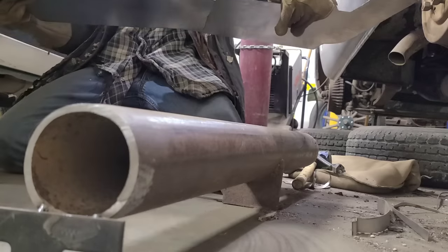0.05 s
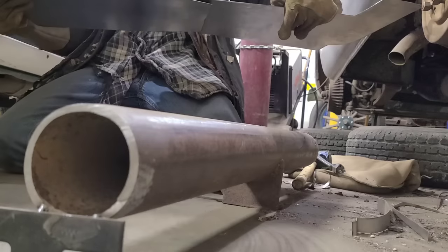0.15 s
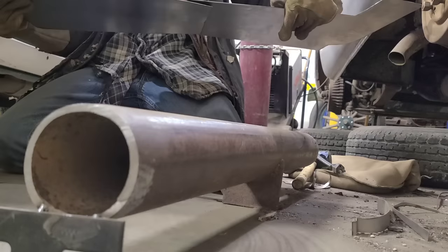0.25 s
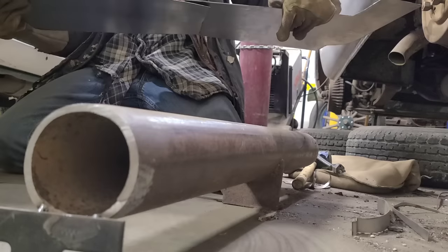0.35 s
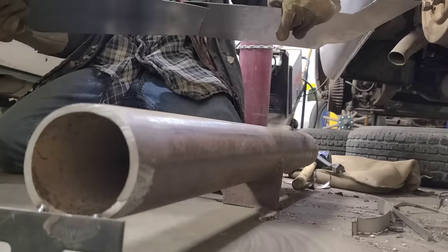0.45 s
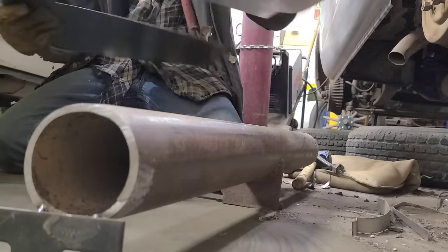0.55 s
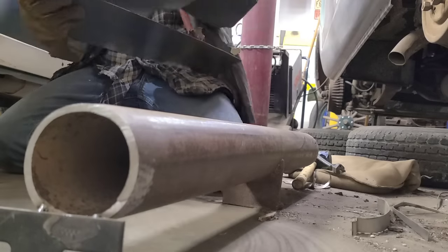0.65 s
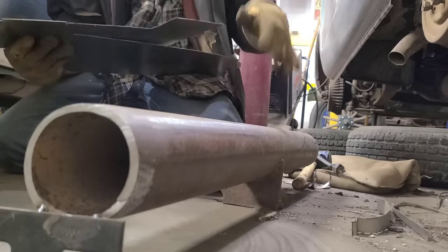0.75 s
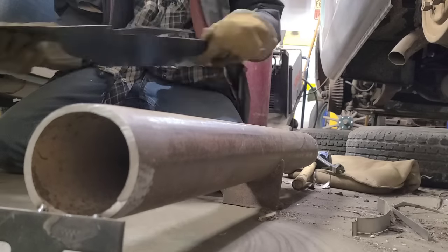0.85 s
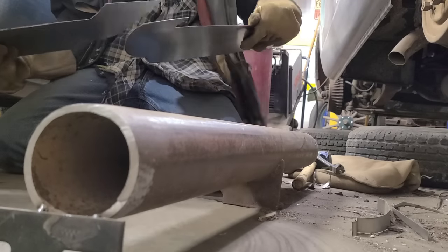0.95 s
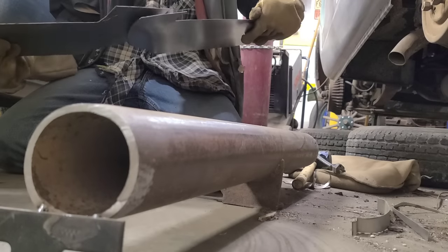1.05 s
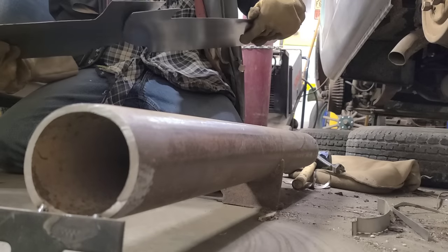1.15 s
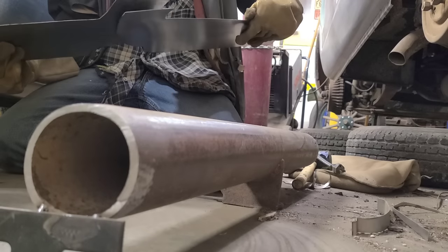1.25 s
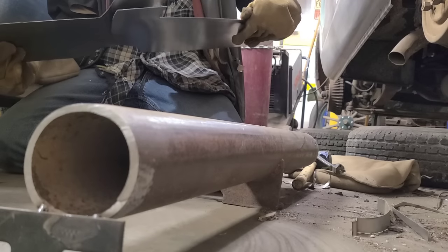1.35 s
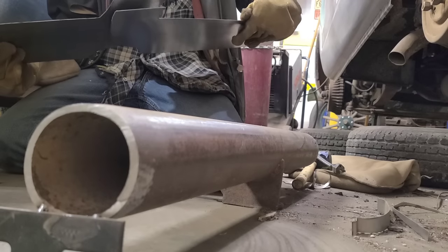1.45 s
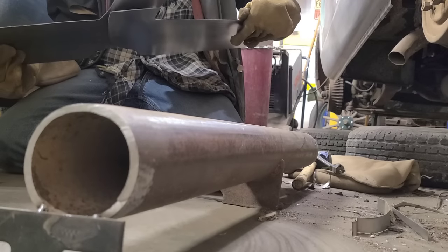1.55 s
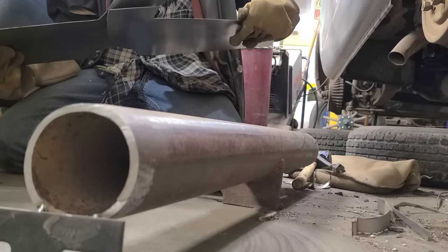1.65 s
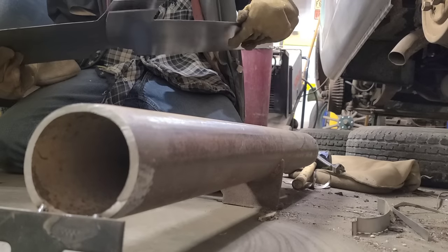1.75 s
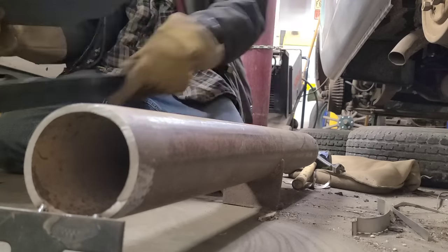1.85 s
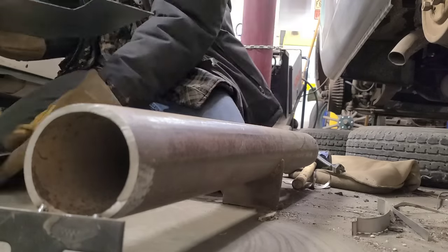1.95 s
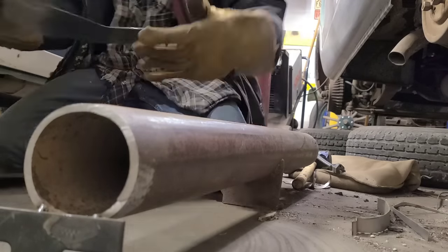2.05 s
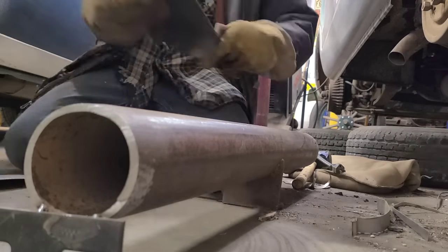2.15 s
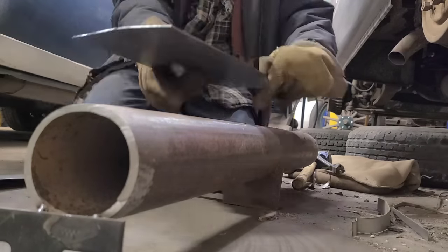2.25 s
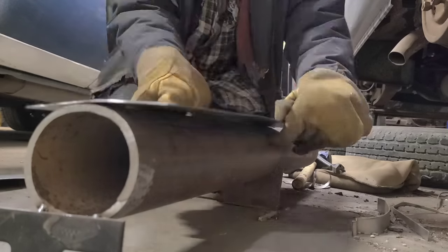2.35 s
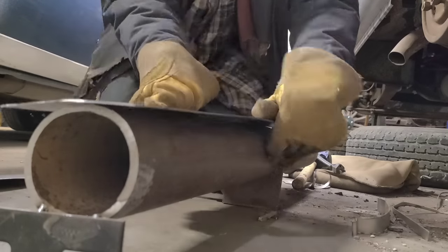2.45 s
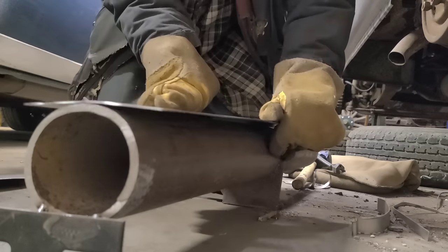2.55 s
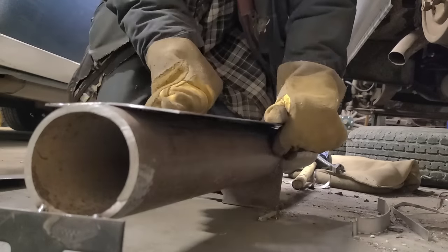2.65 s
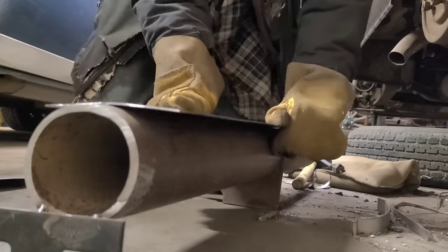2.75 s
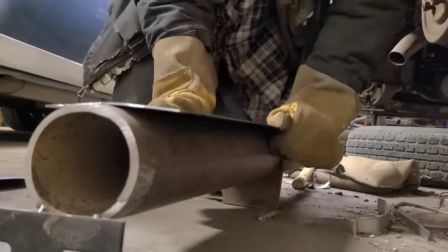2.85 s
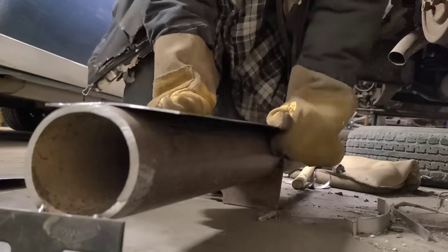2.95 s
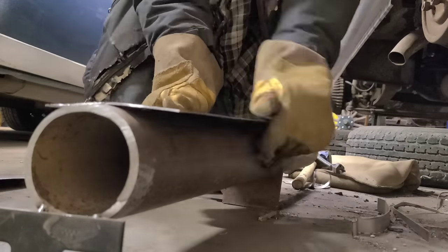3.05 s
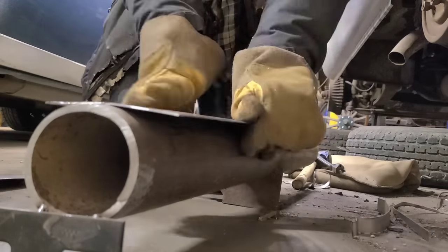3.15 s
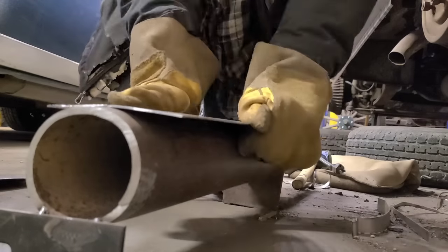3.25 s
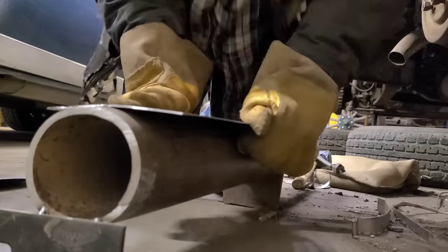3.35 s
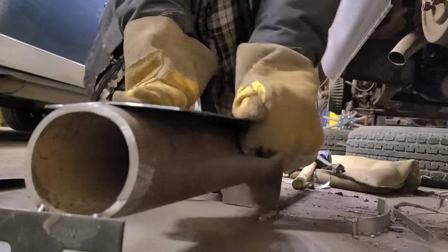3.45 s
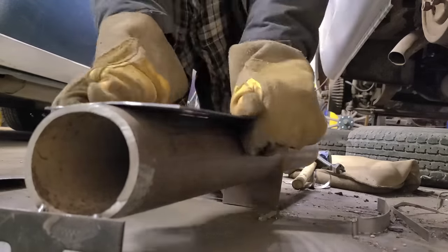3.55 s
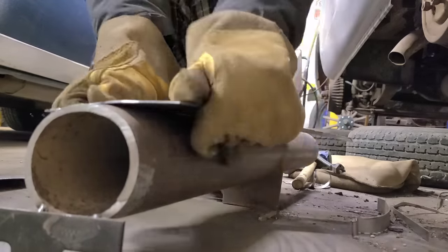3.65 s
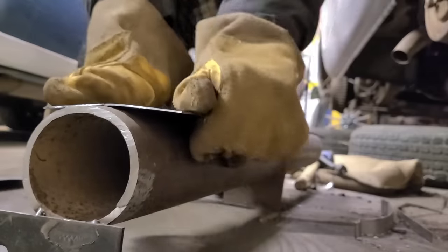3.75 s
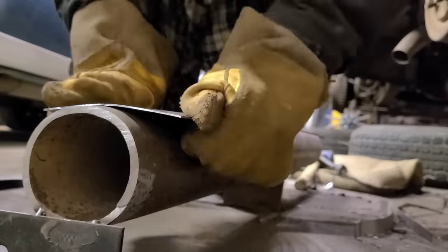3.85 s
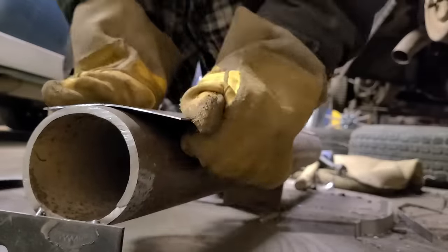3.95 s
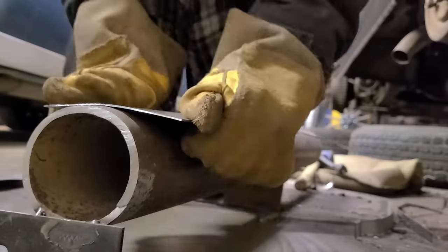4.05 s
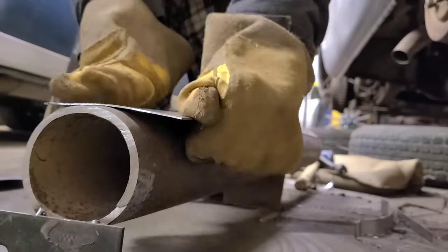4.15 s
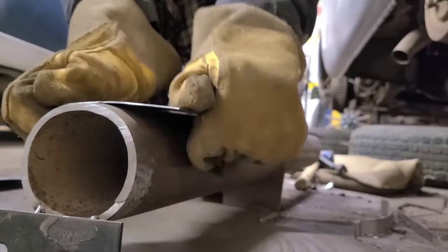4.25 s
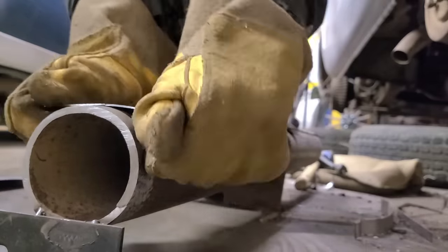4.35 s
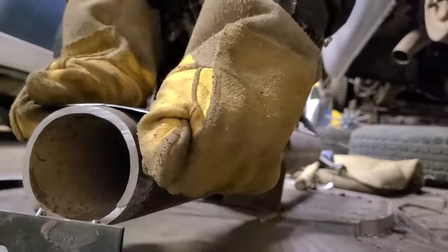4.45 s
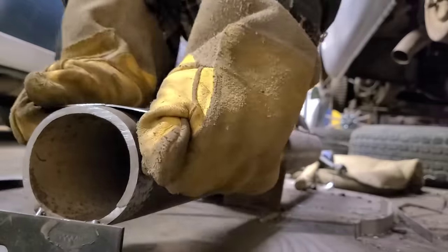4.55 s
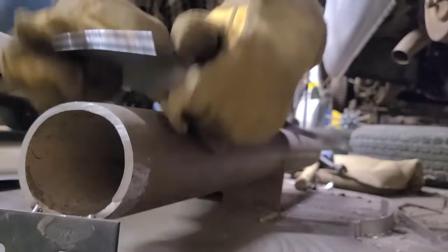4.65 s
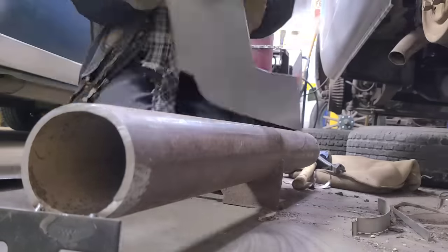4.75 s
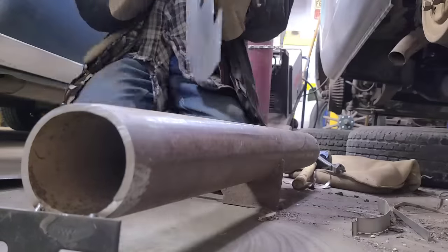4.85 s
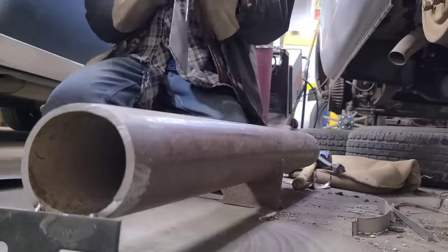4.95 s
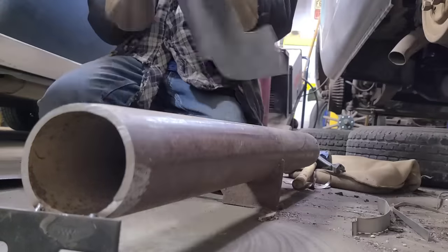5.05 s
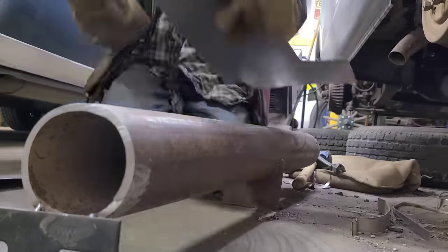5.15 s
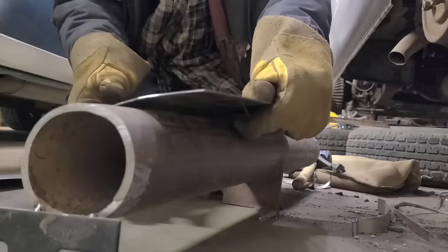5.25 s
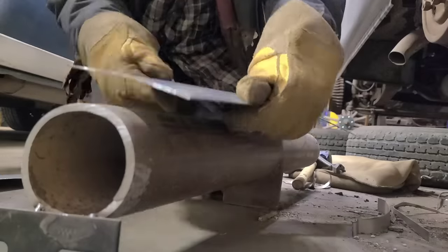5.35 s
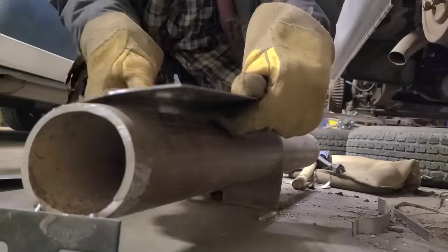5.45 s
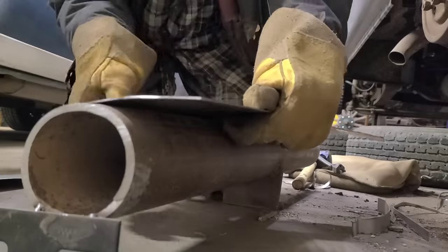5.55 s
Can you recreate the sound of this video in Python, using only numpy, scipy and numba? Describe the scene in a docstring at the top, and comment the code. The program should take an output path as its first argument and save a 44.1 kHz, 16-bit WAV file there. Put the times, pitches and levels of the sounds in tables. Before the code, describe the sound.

A close stereo microphone near the floor hears a cluttered workshop with low rumble, faint wavering hum and a short dull tail. Quiet glove and sheet rustle opens, then at about 0.7 s a sharp, bright steel clang cracks out, followed by a gritty scrape from 0.8 to 0.95 and a lower knock at 1.0. Soft rubbing and near quiet last until 1.9, when the sheet drags over scrap with a loud ringing, hissing clatter until about 2.15. At 2.33 it knocks onto a thick pipe with a small clean ring. From 2.7 to 4.6 pressing brings faint creaks, soft gritty swells and tiny ticks, with firmer knocks from 3.77, a dull heavy clunk near 4.04 and small knocks to 4.6. A light scrape comes at 4.65, a hollow pipe knock at 5.26 and a closing pair of metallic clunks near 5.5.

```python
"""A steel sheet is shifted in gloved hands, dragged over scrap, laid on a thick pipe and pressed round it.
Each contact is a burst of gritty noise that rings modes of the sheet and, once laid, of the pipe;
noise cracks and clean decaying tones add ticks and taps. Flickering fine noise holds rustle and the noisy
tails of loud contacts. The place is a cluttered workshop: short dull tail, low rumble, wavering tone near
91 Hz and room tone. The microphone is a pair of spaced ports near the floor."""
import sys
import numpy as np
from scipy import signal
from scipy.fft import rfft, irfft, next_fast_len
from scipy.io import wavfile
from scipy.ndimage import uniform_filter1d
from numba import njit

SR = 44100
rng = np.random.default_rng(int(sys.argv[2]) if len(sys.argv) > 2 else 0)


def store_wav(level_fs):
    """Save 16-bit WAV to argv[1]."""
    pcm = np.round(np.clip(np.atleast_2d(level_fs), -1, 1) * 32767)
    wavfile.write(sys.argv[1], SR, pcm.T.astype(np.int16))


N = 246519

# knocks and slips of the sheet; weight and brightness against the clang, all before the knock trim:
# (time [s], clang [dB], weight [dB], brightness [dB], hold [s], left minus right [dB], note [Hz])
KNOCKS = [(0.106, -42.5, -32, 1, 0.038, 0, 890), (0.162, -47, -0.5, -18, 0.015, -2, 1430),
          (0.364, -72, 14, 11.5, 0.017, 0, 340), (0.486, -42, -34, 4, 0.012, 2.5, 2583),
          (0.561, -42, 0.5, -1, 0.012, 0.5, 3030), (0.602, -41, -17, -16, 0.025, 2, 357),
          (0.679, -15, -6.5, 0, 0.0029, 1, 397), (0.699, -19.5, -8.5, -34, 0.0075, -3, 370),
          (0.997, -25.5, -8.5, -22, 0.011, -1.5, 1360), (1.025, -28.5, -4.5, -31, 0.0094, -1, 1960),
          (1.511, -58, -12, -5, 0.022, 2.5, 436), (2.326, -28.5, -10.5, 1, 0.031, 2.5, 1130),
          (2.354, -30, -9.5, -3, 0.029, 1, 1120), (2.422, -53, -14, 2, 0.035, 2.5, 1050),
          (2.554, -49, -20, 7.5, 0.023, 4, 1930), (2.576, -44, -18, 9, 0.024, 3, 1120),
          (2.685, -55.5, -3, -27, 0.032, 1, 1090), (3.778, -48, 3, -40, 0.0081, 2, 540),
          (3.866, -44, -5, -1, 0.018, 2, 1880), (3.896, -41, 8, 18.5, 0.0073, 1, 1374),
          (3.981, -35.5, -8, 7, 0.012, 2, 1270), (4.039, -24.5, -14, -30, 0.003, -2, 790),
          (4.061, -44, -2, -6, .008, 3, 720), (4.114, -52.5, -17, -34, 0.0077, -18, 2780),
          (4.2, -42, -6, -11.5, 0.021, 2, 2740), (4.372, -44, 9, -44, 0.012, 1.5, 570),
          (4.397, -45, 5, 0, 0.028, -1, 1020), (4.434, -49, -3, 13, 0.038, 1, 1610),
          (4.54, -41, -2, -18, 0.015, -3, 1154), (4.565, -59.5, -1, 30.5, 0.038, 5.5, 456),
          (4.607, -34.5, -19, -5, 0.014, -0.5, 970), (5.096, -49.5, -8, -34, 0.034, 0, 1145),
          (5.256, -34, -10.5, -26, 0.024, 1, 423), (5.481, -31, -6, -46, .021, -2, 440),
          (5.516, -29.5, -15, -18.5, 0.0072, -0.5, 1300), (5.535, -40.5, -9, -5.5, 0.028, 1, 1250)]
# scrapes and soft swelling presses, one table each, before their trim:
# (time [s], clang [dB], weight [dB], brightness [dB])
SCRAPES_AND_PRESSES = [
    [(0.805, -65.5, -1, -20), (0.813, -54.5, 0.5, -5.5), (0.829, -40, -14, -32.5), (0.845, -34, -5, 6.5),
     (0.881, -27.5, -18.5, 9.5), (0.907, -44.5, -20.5, -2.5), (0.925, -29.5, -7.5, -9),
     (0.933, -41, -11, -11), (0.97, -68, -11, -34)],
    [(1.17, -77, -16.5, 4.5), (1.186, -60, -21, -4), (1.22, -55, -13, -5), (1.26, -58, -3, -1),
     (1.282, -47.5, -11, -4), (1.304, -50, -14, -11), (1.332, -73, -11, -3), (1.34, -93, 13, -7)],
    [(1.8, -72, -4, -11), (1.828, -60, 6.5, -20.5), (1.864, -57, 0, -10), (1.906, -48.5, 1, -19),
     (1.912, -57, 2, 3)],
    [(1.914, -51, -6, -15), (1.92, -21.5, -28, -11.5), (1.95, -19, -19.5, -8.5), (1.99, -29.5, -10, -2),
     (2.018, -14.5, -17, -9), (2.046, -15.5, -21, -0.5), (2.078, -21.5, -14.5, -2), (2.116, -23, -17.5, 1),
     (2.188, -44.5, -56, -33), (2.2, -46, -26, -27)],
    [(3.0, -67, -9, -10), (3.018, -59.5, -2, -12), (3.088, -50.5, -7, -2), (3.132, -72, -13, -18),
     (3.156, -55, -12, -9), (3.2, -65, 4, -1)],
    [(3.235, -66, -1, -4), (3.271, -53, -0.5, -1), (3.369, -60, -8.5, -2), (3.385, -46.5, -6.5, -7),
     (3.423, -64, -4, 3), (3.437, -61.5, -1, -5), (3.475, -53, 1, -1), (3.511, -67.5, 17, -5),
     (3.523, -54, 3, -20), (3.545, -76, -12, -8)],
    [(3.575, -72, -9, 6), (3.617, -56.5, -8, 0), (3.623, -48.5, -12, -13), (3.635, -56, -9, -1),
     (3.647, -58.5, 6, -1), (3.675, -83, -6, -5)],
    [(3.75, -65, 8, 3), (3.768, -53.5, 4.5, -7), (3.778, -38, -15, -12), (3.796, -56, 5, -5),
     (3.802, -74, -7, -18), (3.812, -57.5, 4.5, -4), (3.86, -60, -8, 2)],
    [(3.925, -51, -14, -2), (3.941, -62.5, -19, 18), (3.959, -49, 8, 1), (3.975, -55, 2, -8),
     (3.978, -45, -4, 4)],
    [(4.645, -54, 0, -4), (4.655, -39.5, -18, 1), (4.713, -29.5, -20.5, -29), (4.733, -46, -9, -1.5),
     (4.779, -51, 0, -9), (4.82, -64, -6, 2.5)],
]
# how the sheet is held in each scrape or press:
# (sheet ring [dB], extra hiss [dB], left minus right [dB], note [Hz], note level [dB])
GRIPS = [(-9.5, -4, 0.5, 2500, -19.5), (-3, 0.5, 1, 1370, -29), (-18, 3.5, 0, 1120, -16),
         (9, -3.5, 2, 1856, -20.5), (-8, -1, 0, 1173, -13.5), (-10, 1, 1, 2760, -24.5),
         (-3, 3, 2.5, 1260, -9), (-5, -4, -0.5, 4300, -4), (-10, -3.5, -1, 900, -12),
         (15.5, 1, 1, 2200, -24)]
# how freely the steel rings after a knock, as the gloves tighten and let go: (time [s], level [dB])
FREEDOM = [(0, -17), (.6, 4), (.7, -15), (1.02, -4), (2.33, 3), (2.6, 3), (3.77, 6.5), (4.0, -3.5),
           (4.2, -2), (4.4, -9), (4.61, -2), (5.25, -5.5), (5.59, 4.5)]
# modes of the sheet, loose and then bent under the palms: (frequency [Hz], level [dB], t60 [s])
LOOSE_SHEET_MODES = [(305, -4, .08), (375, 0, .09), (707, -2, .1), (807, -4, .09), (1138, -2, .1),
                     (1323, 0, .13), (1416, -2, .11), (1500, 1, .2), (1545, 1, .2), (1590, -4, .16),
                     (1674, 0, .18), (1712, -4, .35), (1768, -3, .2), (1803, 0, .2), (1855, -2, .42),
                     (1954, -1, .33), (1980, 0, .2), (2015, 2, .38), (2100, -4, .15), (2570, -8, .12),
                     (3279, -8, .1), (3776, -7, .08)]
BENT_SHEET_MODES = [(150, -2, .12), (253, -4, .2), (525, 0, .1), (1007, -3, .1), (1093, -5, .2),
                    (1285, -5, .1), (2008, 8, .25), (2175, 6, .17), (2600, -3, .08), (3068, -6, .1)]
# modes of the pipe's wall and of the air inside it: (frequency [Hz], level [dB], t60 [s])
PIPE_WALL_MODES = [(1120, 4, .35), (2046, -4, .2), (3098, -5, .15)]
PIPE_AIR_MODES = [(409, 0, .33)]
# contact colours from low to high: (centre [Hz], width [Hz], level [dB])
BOOM = [(130, 160, 0)]
THUD = [(369.6, 487, 0)]
CLANG = [(735, 130, -10.5), (1500, 2620, -1.5)]
HISS = [(3360, 1900, 0.042), (6000, 3870, 0.079)]
SIZZLE = [(8440, 5000, 0), (12500, 8200, 1)]
# power share common to both ports, one for each colour from boom to sizzle: (share [0-1])
COMMON_SHARES = [1, 0.78, 0.45, 0.2, 0.42]
# sharp ticks and thumps of edge on steel, before the tick trim:
# (time [s], level [dB], centre [Hz], t60 [s])
TICKS = [(0.6871, -2, 4180, 0.011), (0.69, -30, 95, 0.1), (2.031, -32, 95, 0.17), (1.919, -25, 3920, 0.027),
         (2.039, -3, 2004, 0.016), (2.325, -41, 2600, 0.075), (2.688, -40, 3000, 0.017),
         (2.84, -35.5, 8000, 0.012), (2.897, -36, 6000, 0.015), (2.964, -40.5, 6360, 0.056),
         (3.47, -37, 150, 0.26), (3.803, -32, 1500, .01), (3.891, -25, 6000, 0.034),
         (3.903, -24, 8500, 0.011), (4.032, -22, 2860, 0.13), (4.372, -50, 680, 0.027),
         (5.485, -25, 1404, 0.056)]
# clean taps on the pipe: (time [s], wall level [dB], air column level [dB])
TAPS = [(2.331, -47, -55), (2.37, -73, -71), (2.6, -72, -81), (3.468, -56, -82), (3.773, -79, -49.5),
        (4.679, -40.5, -70), (5.261, -51.5, -33), (5.486, -59, -44)]
# the left port hears contacts first: (time [s], lead [ms])
LEFT_LEAD = [(0, 0.29), (.8, .3), (1.3, 0.2), (2.0, 0.49), (2.3, 0.084), (5.59, 0.19)]
# flickering fine noise, rustle with the noisy tails of the loud contacts:
# (time [s], middle level [dB], treble level [dB])
FINE_NOISE = [(0.0, -68, -64.5), (0.48, -71.5, -81.5), (0.73, -52.5, -67), (0.87, -72, -70),
              (1.31, -75.5, -76.5), (1.85, -70.5, -86), (2.04, -52, -56), (2.18, -62, -62.5),
              (2.54, -63.5, -63), (3.8, -63.5, -64), (3.89, -60, -60.5), (4.31, -61, -61.5),
              (4.66, -56.5, -59), (4.89, -63.5, -64.5), (5.51, -62, -67), (5.59, -65, -61)]
# low rumble, and level near 91 Hz, the hum plus the boom of heavy contacts:
# (time [s], rumble level [dB], level near 91 Hz [dB])
LOW_END = [(0.0, -62, -90), (0.08, -58, -92), (0.15, -66.5, -93), (0.73, -59, -64), (0.78, -68, -66),
           (1.07, -63.5, -77), (1.99, -59.5, -66), (2.48, -68.5, -71), (2.79, -55, -73), (3.02, -64, -73),
           (4.0, -65.5, -57), (4.06, -54, -61), (4.2, -63.5, -63), (4.66, -58.5, -61), (5.59, -68, -62.5)]
# spectrum of the room tone: (frequency [Hz], relative level [dB])
ROOM_TONE = [(59, -24), (100, 4), (129, -5), (194, -7), (270, -9), (900, -37.5), (1170, -83.5),
             (1980, -120)]

LAID_S = 2.3  # after this the sheet lies on the pipe
# knock settings, each for (sheet loose, sheet laid)
RISE_S, FALL_T60_S, SHEET_RING_DB = (0.017, 0.0013), (0.04, 0.047), (-4, -25)
BOOM_OVER_THUD_DB = (-26.5, -5.5)  # (sheet loose, sheet laid)
HISS_DB, HISS_SLOPE = 1.5, 0.63  # hiss against clang [dB], and its share of the brightness
KNOCK_PIPE_DB, SCRAPE_PRESS_PIPE_DB = 11.5, -4  # drive of the pipe
KNOCK_TRIM_DB, SCRAPE_PRESS_TRIM_DB, TICK_TRIM_DB = -10.0, -2.0, -13.5
STEEL_DB = -28.5  # all ringing modes against the direct contact
NOTE_DB, NOTE_T60_S = -13.5, .028  # note of the free span; FREEDOM is added to its level in knocks
CREAK_FROM_S, CREAK_TO_S, CREAK_COUNT = 2.7, 4.6, 22
CREAK_DB, CREAK_SPREAD_DB, CREAK_BRIGHT_DB, CREAK_HOLD_S = -68.5, 24, -5.5, 0.0049
PLATE_T60_S, PLATE_SHARE = .035, .6  # decay, and power share of the dense tail
SHIFT_S = .03  # a scrape or press meets a new spot of the sheet this often
LOW_TONE_HZ, ROOM_TONE_DB = 91.1, -65.5
ROOM_T60_S, ROOM_WET_DB, ROOM_DAMP_HZ = .22, -17.0, 5100.0
TOP_HZ = 15800


def contacts():
    """Knocks, creaks, scrapes and presses are heard directly and through the steel they set ringing."""
    colours = contact_colours()
    direct, loose, bent, pipe = buses = np.zeros((4, 2, N + SR))
    for event in KNOCKS + creaks():
        knock(buses, colours, *event)
    for table, grip in zip(SCRAPES_AND_PRESSES, GRIPS):
        scrape_or_press(buses, colours, table, *grip)
    steel = modes(loose[:, :N], LOOSE_SHEET_MODES)
    steel += modes(bent[:, :N], BENT_SHEET_MODES)
    steel += modes(pipe[:, :N], PIPE_WALL_MODES)
    return direct[:, :N] + undb(STEEL_DB) * steel


def knock(buses, colours, s, db, weight_db, bright_db, hold, pan_db, note_hz):
    """Contact pressure swells, holds, then dies away, and the sheet's free span answers with a note."""
    laid = int(s > LAID_S)
    rise = RISE_S[laid]
    t = np.arange(min(int(.3 * SR), N - int(s * SR))) / SR
    swell = np.sin(np.pi / 2 * np.minimum(t / rise, 1)) ** 2
    fall_db = -60 * np.maximum(t - rise - hold, 0) / FALL_T60_S[laid]
    burst = swell * rub(colours, s, db + KNOCK_TRIM_DB + fall_db, weight_db, bright_db)
    burst = signal.fftconvolve(burst, plate()[None], axes=1)[:, :len(t)]
    # the free span between gloves and contact has a damped note, given for each knock
    free_db = np.interp(s, *np.transpose(FREEDOM))
    heard = burst + undb(NOTE_DB + free_db) * resonate(burst, note_hz, NOTE_T60_S)
    place(buses, s, burst, heard, SHEET_RING_DB[laid] + free_db, pan_db, KNOCK_PIPE_DB + free_db)


def scrape_or_press(buses, colours, table, sheet_db, hiss_db, pan_db, note_hz, note_db):
    """The contact follows drawn levels while it rings one spot of the sheet after another."""
    s, *columns = np.transpose(table)
    t = np.arange(s[0], s[-1], 1 / SR)
    db, weight_db, bright_db = (np.interp(t, s, c) for c in columns)
    burst = rub(colours, s[0], db + SCRAPE_PRESS_TRIM_DB, weight_db, bright_db, hiss_db)
    burst = ring_spots(burst * signal.windows.tukey(len(t), .02))
    heard = burst + undb(note_db) * resonate(burst, note_hz, NOTE_T60_S)
    place(buses, s[0], burst, heard, sheet_db, pan_db, SCRAPE_PRESS_PIPE_DB)


def creaks():
    """Small bright knocks come at random moments while the palms press."""
    when, size, side, pitch = rng.random((CREAK_COUNT, 4)).T
    times = CREAK_FROM_S + (CREAK_TO_S - CREAK_FROM_S) * when
    levels = CREAK_DB + CREAK_SPREAD_DB * (2 * size - 1)
    pans_db, notes_hz = 6 * side - 1, 1000 * 3 ** pitch
    return [(s, db, -10, CREAK_BRIGHT_DB, CREAK_HOLD_S, pan_db, hz)
            for s, db, pan_db, hz in zip(times, levels, pans_db, notes_hz)]


def contact_colours():
    """The same gritty slips are filtered into five bands, partly common to the two ports."""
    slips = [grit() for _ in range(3)]
    bands = (BOOM, THUD, CLANG, HISS, SIZZLE)
    return [pair(*(shaped(v, humps(band)) for v in slips), share)
            for band, share in zip(bands, COMMON_SHARES)]


def rub(colours, s, db, weight_db, bright_db, hiss_db=0):
    """Slips from s on at the levels db; heavy contact adds bass, a bare edge adds treble."""
    now = slice(int(s * SR), int(s * SR) + len(db))
    boom, thud, clang, hiss, sizzle = (c[:, now] for c in colours)
    bass = thud + undb(BOOM_OVER_THUD_DB[int(s > LAID_S)]) * boom
    treble = undb(HISS_DB + hiss_db + HISS_SLOPE * bright_db) * hiss + undb(bright_db) * sizzle
    return undb(db) * (clang + undb(weight_db) * bass + treble)


def place(buses, s, burst, heard, sheet_db, pan_db, pipe_db):
    """The contact is heard and drives the sheet, and the pipe once they touch."""
    direct, loose, bent, pipe = buses
    add(direct, s, heard, pan_db)
    add(bent if s > LAID_S else loose, s, undb(sheet_db) * burst, pan_db)
    if s > LAID_S:
        add(pipe, s, undb(pipe_db) * burst, pan_db)


def plate():
    """A decaying noise tail stands for the thin sheet's countless damped modes, new at every call."""
    t = np.arange(1500) / SR
    tail = rng.standard_normal(len(t)) * undb(-60 * t / PLATE_T60_S)
    tail = tail / np.sqrt(np.sum(tail ** 2))
    return np.sqrt(PLATE_SHARE) * tail + np.sqrt(1 - PLATE_SHARE) * (t == 0)


def ring_spots(burst):
    """Each short stretch of a scrape or press rings another spot of the sheet."""
    step = int(SHIFT_S * SR)
    out = np.zeros((2, burst.shape[1] + step + 1500))
    for at in range(0, burst.shape[1], step):
        piece = signal.fftconvolve(burst[:, at:at + step], plate()[None], axes=1)
        out[:, at:at + piece.shape[1]] += piece
    return out


def ticks(cycles=1.1):
    """Sudden cracks: decaying noise without a swell, broad around its centre."""
    out, t = np.zeros((2, N + SR)), np.arange(2000) / SR
    noises = rng.standard_normal((len(TICKS), 3, len(t)))
    for (s, db, hz, t60), noise in zip(TICKS, noises):
        crack = resonate(pair(*noise, 0.093), hz, cycles / hz)
        add(out, s, unit(crack) * undb(db + TICK_TRIM_DB - 60 * t / t60))
    return out[:, :N]


def taps(swell_s=0.0015):
    """One clean blow starts the wall's modes and the air in the pipe together."""
    out, t = np.zeros((2, N + SR)), np.arange(SR // 2) / SR
    wall, air = (sum(undb(db - 60 * t / t60) * np.sin(2 * np.pi * hz * t) for hz, db, t60 in body)
                 for body in (PIPE_WALL_MODES, PIPE_AIR_MODES))
    swell = np.minimum(t / swell_s, 1)
    for s, wall_db, air_db in TAPS:
        sound = swell * (undb(wall_db) * wall + undb(air_db) * air)
        add(out, s, np.array([sound, sound]))
    return out[:, :N]


def fine_noise():
    """Fine grit that flickers, wide between the ports: rustle and the noisy tails of loud contacts."""
    middle_db, treble_db = curves(FINE_NOISE)
    middle = [(370, 930, 10.8), (1300, 1800, 7.5)]  # (centre [Hz], width [Hz], level [dB])
    treble = [(3180, 18000, 10.5), (5700, 2200, -1.1), (13820, 3700, -10)]
    out = 0
    for db, colour in ((middle_db, middle), (treble_db, treble)):
        grains = [shaped(grit(scatter_db=2.0, slip_s=0.0014), humps(colour)) for _ in range(3)]
        out = out + pair(*grains, 0.31) * undb(db + 0.49 * walk(25))
    return out


def low_end_and_room_tone():
    """Filtered noise makes rumble and room tone; a wavering sine and octave make hum and contact boom."""
    rumble_db, low_tone_db = curves(LOW_END)
    rumble_colour = humps([(38.4, 12.0, 4.9), (64.3, 28, 3.5)])
    rumble = shaped(rng.standard_normal(N), rumble_colour) * undb(rumble_db)
    phase = 2 * np.pi * np.cumsum(LOW_TONE_HZ * (1 + 0.0083 * walk(2))) / SR
    waver_db = 1.8 * walk(12)
    low_tone = np.sin(phase) + undb(-5.0) * np.sin(2 * phase)
    low_tone = np.sqrt(2) * undb(low_tone_db + waver_db) * low_tone
    hz, db = np.transpose(ROOM_TONE)
    tone = [shaped(rng.standard_normal(N), lambda f: undb(np.interp(np.log(f), np.log(hz), db)))
            for _ in range(3)]
    bass = (rumble + low_tone) * undb([[1.1], [-1.1]])  # a little stronger at the left port
    return bass + pair(*tone, 0.89) * undb(ROOM_TONE_DB)


def room(x):
    """A short, dull noise tail from the cluttered shop, other for each port."""
    t = np.arange(int(.6 * SR)) / SR
    tails = rng.standard_normal((2, len(t))) * undb(-60 * t / ROOM_T60_S) * (t > .004)
    tails = signal.lfilter(*signal.butter(1, ROOM_DAMP_HZ, fs=SR), tails)
    tails = tails / np.sqrt(np.sum(tails ** 2, axis=1, keepdims=True))
    middle = x.mean(axis=0, keepdims=True)
    return x + undb(ROOM_WET_DB) * signal.fftconvolve(middle, tails, axes=1)[:, :N]


def add(out, s, sound, pan_db=0.):
    """Place a sound at both ports, the right one a little later."""
    at = int(s * SR)
    late = int(np.interp(s, *np.transpose(LEFT_LEAD)) * SR / 1000)
    for ch, (start, side_db) in enumerate(((at, pan_db / 2), (at + late, -pan_db / 2))):
        out[ch, start:start + sound.shape[1]] += undb(side_db) * sound[ch]


def pair(common, left, right, alike):
    """Two ports share the power fraction alike of a noise; the rest is their own."""
    return np.sqrt(alike) * common + np.sqrt(1 - alike) * np.array([left, right])


@njit
def ring(x, poles, gains):
    """Sum of decaying modes struck by x."""
    y = np.zeros(len(x))
    for k in range(len(poles)):
        z = 0j
        for i in range(len(x)):
            z = z * poles[k] + x[i] + 1e-18
            y[i] += gains[k] * z.imag
    return y


def modes(x, table):
    """Ring a table of modes; each port stands in another spot of every mode's pattern."""
    hz, db, t60 = np.transpose(table)
    decay = np.log(1000) / (t60 * SR)
    poles = np.exp(2j * np.pi * hz / SR - decay)
    spot_db = rng.uniform(-2, 2, (2, len(hz)))
    return np.array([ring(v, poles, np.sqrt(decay) * undb(db + d)) for v, d in zip(x, spot_db)])


def resonate(x, hz, t60):
    """One damped mode, gain near 1 in noise power."""
    r = np.exp(-np.log(1000) / (max(t60, .0002) * SR))
    gain = np.sqrt(1 - r * r)
    return signal.lfilter([gain, 0, -gain], [1, -2 * r * np.cos(2 * np.pi * hz / SR), r * r], x)


def grit(scatter_db=3., slip_s=.003):
    """Dense slips of uneven size: noise whose level steps at random, slightly smoothed."""
    k = int(slip_s * SR)
    sizes = undb(scatter_db * np.clip(rng.standard_normal(N // k + 1), -2, 2))
    return unit(rng.standard_normal(N) * uniform_filter1d(np.repeat(sizes, k)[:N], k))


def walk(rate):
    """Random levels held 1 / rate s and smoothed twice, scaled to RMS 1."""
    k = int(SR / rate)
    held = np.repeat(rng.standard_normal(N // k + 1), k)
    return unit(uniform_filter1d(uniform_filter1d(held, k), k)[:N])


def humps(table):
    """Gain of broad resonances with steep skirts, summed in power."""
    def gain(f):
        return np.sqrt(sum(undb(db) ** 2 / (1 + ((f / hz - hz / f) * hz / width) ** 2) ** 3
                           for hz, width, db in table))
    return gain


def shaped(x, gain_of_hz):
    """Filter x by a gain over frequency and scale it to RMS 1."""
    size = next_fast_len(N)
    gain = gain_of_hz(np.fft.rfftfreq(size, 1 / SR) + 1)
    return unit(irfft(rfft(x, size) * gain, size)[:N])


def curves(table):
    """Draw every column of a table as straight lines over time."""
    s, *columns = np.transpose(table)
    return [np.interp(np.arange(N) / SR, s, c) for c in columns]


def unit(x):
    """Scale to RMS 1."""
    return x / np.sqrt(np.mean(x ** 2))


def undb(db):
    """Amplitude factor of a level in dB."""
    return 10 ** (np.asarray(db) / 20)


def scene():
    """Steel in the room's tail, with the fine noise, low end and room tone added dry."""
    return room(contacts() + ticks() + taps()) + fine_noise() + low_end_and_room_tone()


def record(dry):
    """The recorder cuts the top with a steep low-pass."""
    return signal.sosfilt(signal.ellip(12, .2, 90, TOP_HZ, fs=SR, output="sos"), dry)


dry = scene()
out = record(dry)
store_wav(out)
```